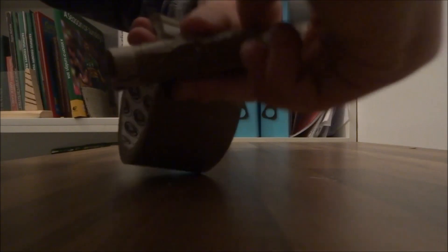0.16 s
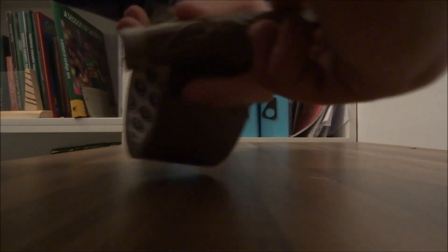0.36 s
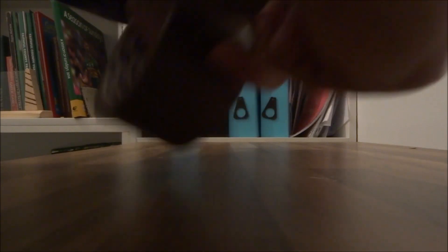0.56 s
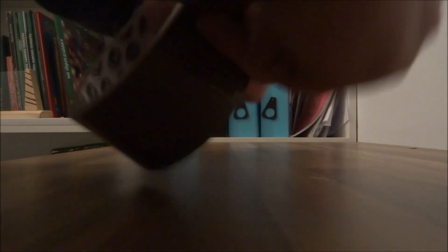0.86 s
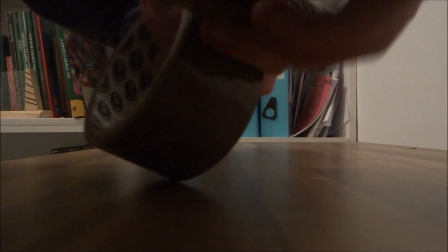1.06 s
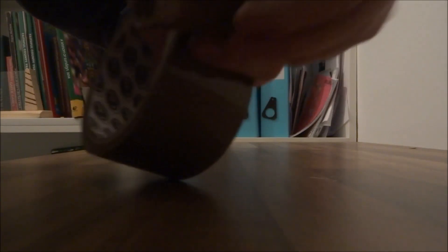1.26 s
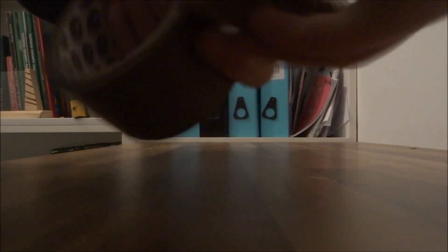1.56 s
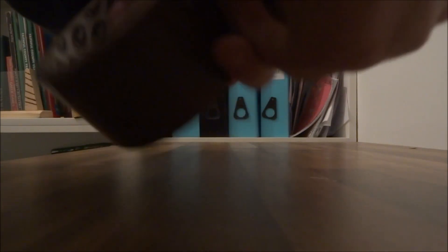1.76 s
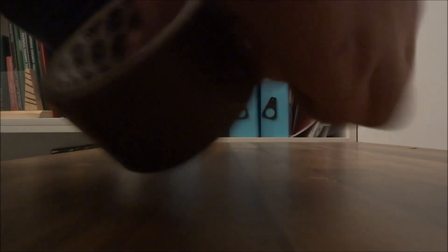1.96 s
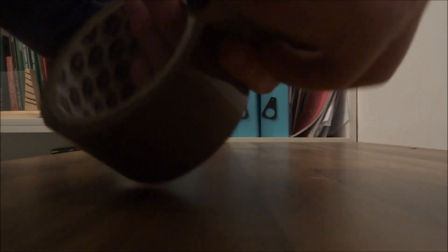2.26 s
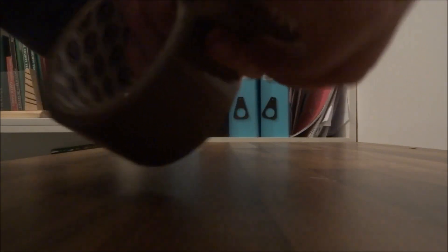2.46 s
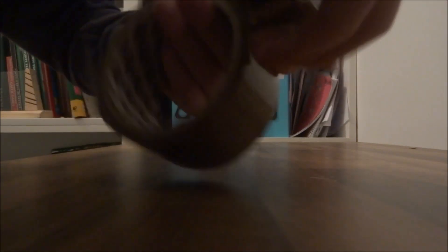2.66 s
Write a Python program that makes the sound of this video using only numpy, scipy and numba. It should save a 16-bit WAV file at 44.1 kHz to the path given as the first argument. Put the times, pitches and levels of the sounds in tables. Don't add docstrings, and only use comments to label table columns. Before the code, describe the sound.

Packing tape rips off a roll, close and bright. After a faint tick, crackling strokes run from 0.2 to 0.7 s, strongest near 0.55, then scattered snaps until 1.25. Dense rips follow at 1.3-1.75, then shorter ones around 2.05 and a sharp one at 2.27. Hands rub cardboard; low table bumps and drags come at 1.0, 1.26, 2.04, 2.19 and a last soft thud at 2.78. Quiet small room.

```python
import sys
import numpy as np
from scipy import signal
from scipy.fft import rfft, irfft
from scipy.io import wavfile
from scipy.ndimage import uniform_filter1d
from numba import njit

SR = 44100
rng = np.random.default_rng(int(sys.argv[2]) if len(sys.argv) > 2 else 0)


def linear_from_db(decibels):
    return 10 ** (np.asarray(decibels, float) / 20)


def transcribe(signal):
    frames = np.atleast_2d(signal).T
    limited = np.clip(frames, -1, 1)
    pcm = np.round(limited * 32767).astype(np.int16)
    wavfile.write(sys.argv[1], SR, pcm)


N = 123480

# [pitch_hz, density_db]
AIR = [(18, -59), (30, -4.5), (1390, -4.5), (1540, -3), (2170, -3.5), (16000, -9)]
# [start_s, film_click_db, roll_ring_db]
GLUE_SNAPS = [(0.0159, -28, -41), (0.193, -10.5, -14), (0.2085, -7, -8.5), (0.2511, -1.5, -12),
              (0.2626, -1.5, -15.5), (0.304, -2.5, -16), (0.3281, 2, -20), (0.3977, -6.5, -33),
              (0.526, -7, -15.5), (0.56, -24, -15), (0.628, -21, -11), (0.7066, -5.5, -37),
              (0.8229, -22, -27.5), (0.8441, -20, -18), (0.865, -17, -22), (0.8937, -12.5, -29),
              (0.9188, -3, -15.5), (0.9548, -1, -43), (0.99, -18, -27),
              (1.1041, -11, -22.5), (1.1527, -24, -31), (1.1744, -8, -17), (1.2251, -4.5, -57),
                (1.2493, -32, -20.5), (1.28, -13, -20), (1.3004, -21, -19.5), (1.3307, 0.5, -11),
                (1.355, 2.5, -32), (1.3805, -1, -21), (1.479, 0, -16.5), (1.5383, 0, -14.5),
                (1.546, -22, -45), (1.5748, -6, -24), (1.653, -2, -14.5), (1.673, 4, -18.5),
                (1.6797, -3, -17), (1.8052, -0.5, -31),
              (1.87, -14.5, -26.5), (1.895, -22.5, -39), (1.95, -2.5, -15.5), (1.9842, -12, -46),
              (2.0585, -1, -25), (2.0695, -2.5, -18.5), (2.0754, -3.5, -34), (2.097, -3.5, -24),
              (2.105, -15, -46), (2.1829, -10.5, -18.5), (2.2703, -26, -29), (2.3126, -2, -25),
              (2.507, -33, -35)]
SNAPS = GLUE_SNAPS
# [start_s, level_db, brightest_hz]
TICKS = [(.0179, -13.5, 14000), (0.26, -6, 12000), (0.2727, -8, 11000), (.3128, -18, 12000),
         (.324, -17, 12500), (0.3379, -1.5, 12000), (.389, -10, 6960), (0.545, 2, 6750), (0.5623, -9, 7500),
         (.5705, -6, 12000), (1.1032, -12, 6300), (1.2274, -8.5, 6950), (1.2495, -18, 10900),
         (1.3058, -3.5, 11600), (1.3135, -8, 11000), (1.4888, -4, 12100), (1.569, -2, 8200),
         (1.8515, -15.5, 13000), (1.917, -35, 11000), (1.936, -37, 8200), (1.992, -16.5, 12100),
         (2.02, -27, 10500), (2.089, -15, 7800), (2.093, -4, 7800), (2.108, -7, 7800), (2.2703, -6.5, 9400),
         (2.2803, 1.5, 12800), (2.3235, -4, 12500), (2.468, -27, 8000), (2.5068, -3.5, 11900)]
# [start_s, level_db, pitch_hz]
PLUCKS = [(0.207, -14.5, 1300), (0.252, -18, 1230), (0.447, -18.5, 1190), (0.526, -11.5, 1170),
          (0.551, -9, 1170), (0.747, -26.5, 604), (0.823, -20.5, 950), (0.865, -26.5, 655),
          (1.152, -28.5, 1220), (1.175, -19.5, 1185), (1.28, -25.5, 1020), (1.301, -14.5, 1160),
          (1.33, -13, 1290), (1.446, -21, 1490), (1.855, -20, 1200), (1.938, -24.5, 1060),
          (2.183, -14.5, 990),
          (0.2084, -9.5, 2370), (0.627, -5.5, 2440), (0.697, -14.5, 2380), (0.7487, -16.5, 2100),
               (1.3299, -23, 1860), (1.9906, -20, 2030), (2.0874, -8.5, 1920), (2.2707, -14.5, 2050),
               (2.3146, -11.5, 1940),
          (0.302, -28, 600), (1.356, -23, 593),
          (0.447, -20.5, 2740), (.789, -32, 1190), (.824, -8.5, 2940), (1.836, -27.5, 1350),
           (1.849, -24.5, 1980), (1.869, -20, 1170), (1.883, -21, 2750), (1.895, -21, 2030),
           (1.936, -22, 2030), (1.99, -19, 1280), (2.008, -31, 1610), (2.068, -16.5, 1250),
           (2.078, -10, 3770), (2.117, -20, 1100), (2.184, -19.5, 1880), (2.256, -30, 1960),
           (2.468, -34.5, 1080)]
# [pitch_hz, width_hz, level_db]
FILM = [(7210, 2100, 6), (9130, 1800, 4.5), (10860, 4160, 4), (14100, 7300, 1.5), (5060, 2030, 4)]
# [pitch_hz, width_hz, level_db]
SHORT_FILM = [(7500, 930, 11.5), (9320, 830, 9), (11400, 7500, 4), (15100, 2500, 2), (5450, 2600, -3)]
# [pitch_hz, width_hz, level_db]
ROLL = [(2246, 260, -0.5), (2986, 260, 4.5), (3360, 520, 6), (3820, 420, 4.5), (5890, 1430, -2.5)]
# [pitch_hz, width_hz, level_db]
TUBE = [(604, 180, -6.5), (976, 150, 6.5), (1193, 280, 5), (1490, 820, -16)]
# [start_s, level_db, push_s, knock_db]
BUMPS = [
    (.028, -65, .005, 15),
    (0.149, -57, 0.0041, 3),
    (1.009, -45, 0.008, -24),
    (1.258, -33, 0.012, -12),
    (2.044, -29, 0.005, 3.5),
    (2.185, -23.5, 0.007, -5.5),
    (2.775, -28, 0.015, -9),
]
# [pitch_hz, level_db, t60_s]
TABLE = [(49.3, -5, 0.3), (91, 7.5, 0.059), (182.6, -6, 0.19)]
# [pitch_hz, level_db, t60_s]
KNOCK = [(193, 0, 0.033), (385, -6, 0.1)]
# [start_s, length_s, level_db]
DRAGS = [
    (0.163, 0.1, -58.5),
    (1.006, 0.19, -50),
    (1.28, 0.21, -50.5),
    (2.063, 0.222, -41.5),
    (2.3, 0.25, -52),
]
# [start_s, level_db]
HANDS = [(0.031, -77), (.1, -82), (.4, -48), (.98, -54.5), (1.03, -52), (1.12, -46.5), (1.24, -49),
         (1.75, -45), (2.45, -59), (2.601, -40.5), (2.8, -46.5)]
# [pitch_hz, density_db]
RUB = [(71, -17.5), (120, -18.5), (630, -4), (822, -14), (5410, -16.5), (16000, -24)]
# [start_s, hold_s, level_db, t60_s, roll_and_tube_ring_db]
RIPS = [(0.202, 0.0043, -29, 0.41, 3), (0.263, 0.0047, -25.5, 0.93, -1.5), (0.32, 0.025, -21, 0.43, 7),
        (0.543, 0.022, -13, 0.027, 2.5), (0.567, 0.056, -16, 0.021, 5), (0.624, 0.02, -22, 0.34, 5.5),
        (0.833, 0.028, -36.5, 0.11, 7), (0.913, 0.067, -34.5, 0.15, 1), (1.303, 0.0056, -23, 0.12, 0.5),
        (1.332, 0.046, -33, 0.051, 10), (1.377, 0.015, -22.5, 0.54, 3), (1.483, 0.051, -19, 0.032, 2),
        (1.538, 0.022, -23.5, 0.017, 4.5), (1.562, 0.042, -17.5, 0.48, 0),
        (1.655, 0.008, -26.5, 0.013, 9.5), (1.687, 0.029, -21, 0.35, 1), (1.949, 0.025, -39, 0.37, 4),
        (2.054, 0.057, -24, 0.2, 1), (2.177, 0.0057, -32.5, 0.83, 0.5), (2.266, 0.061, -17.5, 0.012, -3),
        (2.33, 0.019, -20.5, 0.26, -1)]
# [start_s, pitch_hz]
SQUEEZE = [(.3, 3380), (.44, 3320), (.55, 3320), (.62, 3320), (.635, 2960), (.85, 3100), (1.4, 3220),
           (1.55, 3130), (1.72, 3240), (2.06, 3460), (2.28, 3330), (2.33, 3920)]
# [start_s, level_db]
GRIP = [(.3, -4.5), (.58, 0.5), (.8, 0), (1.4, 4), (1.52, 6), (1.62, 0.5), (1.75, -1), (2.1, 3), (2.3, -9)]


def unit(x):
    return x / np.sqrt(np.mean(x ** 2))


def ring(x, hz, width):
    return signal.lfilter(*signal.iirpeak(hz, hz / width, SR), x)


def walk(rate):
    k = int(SR / rate)
    steps = np.repeat(rng.standard_normal(N // k + 1), k)
    return 1.56 * uniform_filter1d(uniform_filter1d(steps, k), k)[:N]


def coloured(points, channels=1):
    hz, db = np.array(points).T
    log_hz = np.log(np.arange(N // 2 + 1) * SR / N + 1)
    gain = linear_from_db(np.interp(log_hz, np.log(hz), db))
    return unit(irfft(rfft(rng.standard_normal((channels, N))) * gain, N))


def room_air():
    return coloured(AIR, channels=2) * linear_from_db(-48.5)


def burst(t):
    crack_s, tail_s, tail_db = 0.0005, 0.0081, -19
    cracks = rng.standard_normal(len(t)) * linear_from_db(2 * rng.standard_normal(len(t)))
    return cracks * (np.exp(-t / crack_s) + linear_from_db(tail_db) * np.exp(-t / tail_s))


def snap_colour(x, body):
    y = 0
    for hz, width, db in body:
        level_shift, pitch_shift = rng.standard_normal(2)
        rung = ring(ring(x, hz, 3 * width), hz * (1 + pitch_shift / 20), width)
        y = y + linear_from_db(db + level_shift) * rung
    return y


def snaps():
    out, t = np.zeros(N + SR), np.arange(SR // 20) / SR

    def place(start, db, y):
        i = int(start * SR)
        out[i:i + len(t)] += linear_from_db(db) * y / np.abs(y).max()

    for start, film_db, roll_db in SNAPS:
        x = burst(t)
        place(start, film_db + 0.5, snap_colour(x, FILM))
        place(start, roll_db + 6, snap_colour(x, ROLL))
    plucks = PLUCKS
    for events, sharpness in ((plucks, 4), (TICKS, 2)):
        for start, db, hz in events:
            place(start, db, ring(ring(burst(t), hz, hz / sharpness), hz, hz))
    return out[:N]


def wall_echo(x):
    lag = int(0.0092 * SR)
    delayed = np.concatenate([np.zeros(lag), x[:-lag]])
    return linear_from_db(-9) * ring(delayed, 15600, 14800)


def room(x):
    t60_s, gap_s, rise_s = 0.2, 0.003, 0.0011
    t = np.arange(int(0.4 * SR)) / SR
    tail = rng.standard_normal((2, len(t))) * linear_from_db(-60 * t / t60_s) * np.clip((t - gap_s) / rise_s, 0, 1)
    tail = signal.lfilter([1], [1, -0.3], tail)
    tail = tail / np.sqrt((tail ** 2).sum(1, keepdims=True))
    return signal.fftconvolve(x[None], tail, axes=1)[:, :N]


def struck(modes, t):
    return sum(linear_from_db(db) * np.sin(2 * np.pi * hz * t) * linear_from_db(-60 * t / t60) for hz, db, t60 in modes)


def bumps():
    out, t = np.zeros(N + SR), np.arange(SR // 2) / SR
    for start, db, push, knock_db in BUMPS:
        soft = np.hanning(int(push * SR) + 3)
        thud = np.convolve(struck(TABLE, t), soft / soft.sum())[:len(t)]
        i = int(start * SR)
        out[i:i + len(t)] += linear_from_db(db) * (thud + linear_from_db(knock_db) * struck(KNOCK, t))
    return signal.lfilter(*signal.butter(2, 38, "high", fs=SR), out[:N])


def hands():
    start, db = np.array(HANDS).T
    effort = np.interp(np.arange(N) / SR, start, db) + 1
    grain = 2.0 * walk(27.88) + 1.53 * walk(200)
    return linear_from_db(effort + grain) * coloured(RUB)[0]


def drags():
    t, fade_s = np.arange(N) / SR, 0.021
    drag = sum(linear_from_db(db) * np.clip(np.minimum(t - start, start + length - t) / fade_s, 0, 1)
               for start, length, db in DRAGS)
    hz = 50 * (1 + 0.0365 * walk(13.04))
    hum = linear_from_db(2.9 * walk(23)) * np.sin(2 * np.pi * np.cumsum(hz) / SR)
    rumble = unit(ring(ring(rng.standard_normal(N), 60, 55), 53, 39))
    return drag * (hum + linear_from_db(-14) * rumble)


@njit
def glide(x, hz, width):
    y, band, low = np.empty(len(x)), 0., 0.
    for i in range(len(x)):
        g, damping = np.tan(np.pi * hz[i] / SR), width / hz[i]
        v = (band + g * (x[i] - low)) / (1 + g * (g + damping))
        band, low, y[i] = 2 * v - band, low + 2 * g * v, damping * v
    return y


def sung(x, body, bend=1):
    out = 0
    for k, (centre, width, db) in enumerate(body):
        hz = centre * bend * (1 + 0.02 * walk(12))
        level = (-1) ** k * linear_from_db(db + 2 * walk(45.06))
        out = out + level * glide(glide(x, hz, 2. * width), hz, 1. * width)
    power = sum(linear_from_db(2 * db) * width for _, width, db in body)
    return out * np.sqrt(SR / power / 3)


def glue_clicks():
    clicks_per_s, stick_s, stick_share = 15000, 0.0035, 0.75
    clicks = (rng.random(N) < clicks_per_s / SR) * rng.standard_normal(N)
    clicks = clicks * linear_from_db(1.0 * rng.exponential(size=N))
    for start, *_ in SNAPS:
        clicks[int((start - stick_s) * SR):int(start * SR)] *= 1 - stick_share
    return unit(clicks * linear_from_db(1.1 * walk(150)))


def rips():
    t, film, wood = np.arange(N) / SR, 0, 0
    for start, hold, db, t60, ring_db in RIPS:
        fall = linear_from_db(db - 60 * np.clip(t - start - hold, 0, None) / t60)
        shape = fall * np.clip((t - start) / 0.0022, 0, 1)
        film = film + shape
        wood = wood + shape * linear_from_db(ring_db)
    clicks = glue_clicks()
    short = t > 2.03
    broad = linear_from_db(-6.5) * ring(clicks * np.sign(rng.standard_normal(N)) * film, 8200, 14800)
    film_ring = sung(clicks * film * ~short, FILM) + sung(clicks * film * short, SHORT_FILM)
    bend = np.interp(t, *np.array(SQUEEZE).T) / 3350
    roll_ring = linear_from_db(-6) * sung(clicks * wood, ROLL, bend)
    grip = linear_from_db(np.interp(t, *np.array(GRIP).T))
    tube_ring = linear_from_db(-17.5) * sung(clicks * wood * grip, TUBE)
    return broad + film_ring + roll_ring + tube_ring


def stereo_difference(near, air):
    skew = np.roll(near, 9) * linear_from_db(-27.5)
    skew = skew + linear_from_db(-16) * ring(np.roll(near, 28), 430, 190)
    skew = skew - linear_from_db(-20) * ring(near, 7000, 14000)
    skew = skew + linear_from_db(-23) * ring(np.roll(near, 31), 8600, 9000)
    side_air = signal.lfilter(*signal.butter(2, 246, "high", fs=SR), air) * linear_from_db(-2.5)
    side_rub = linear_from_db(-6.5) * ring(hands(), 330, 370)
    return skew + side_air + side_rub


def scene():
    air = room_air()
    high_pass = signal.butter(4, 476, "high", fs=SR, output="sos")
    snapping, ripping = signal.sosfilt(high_pass, [snaps(), rips()])
    near = snapping + ripping + wall_echo(snapping) + hands()
    sides, balance_db = np.array([[1], [-1]]), 0.95
    direct = near * linear_from_db(sides * balance_db / 2) + sides * stereo_difference(near, air[1])
    return direct + linear_from_db(-13) * room(near) + bumps() + drags() + air[0]


def roll_off(x):
    return signal.sosfilt(signal.butter(12, 16810, fs=SR, output="sos"), x)


def record(dry):
    ceiling, knee = 0.95, 6
    x = ceiling * dry / (ceiling ** knee + np.abs(dry) ** knee) ** (1 / knee)
    low = signal.sosfiltfilt(signal.ellip(10, 0.1, 40, 15750, fs=SR, output="sos"), x)
    motion = np.abs(np.diff(x.sum(0), prepend=0))
    sharp = uniform_filter1d(motion, size=90) > 2.2 * uniform_filter1d(motion, size=1500)
    opening = np.clip(3 * uniform_filter1d(1. * sharp, size=260), 0, 1)
    mix = low + (x - low) * linear_from_db(-10) * opening
    return roll_off(mix)


dry = scene()
out = record(dry)
transcribe(out)
```